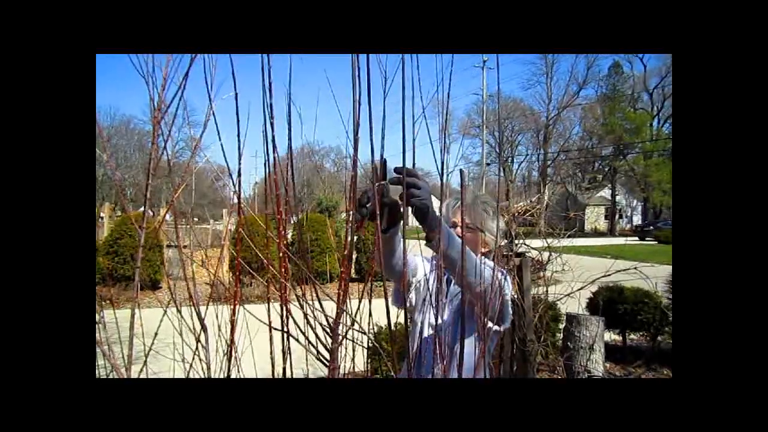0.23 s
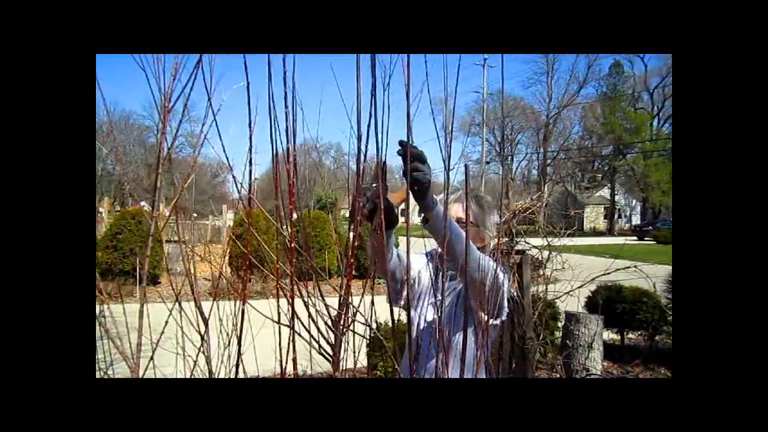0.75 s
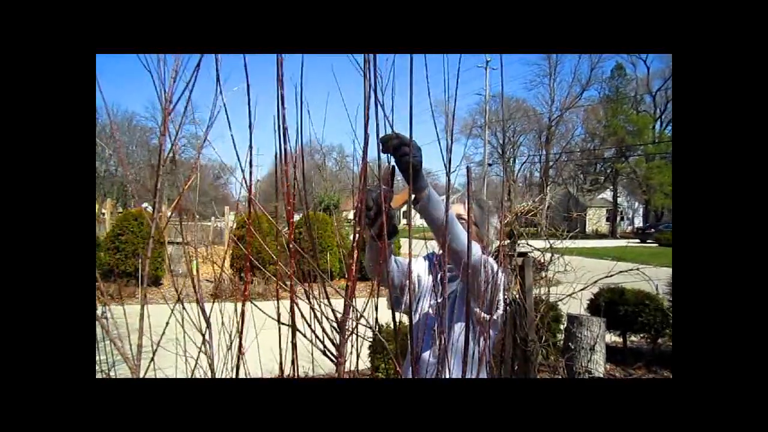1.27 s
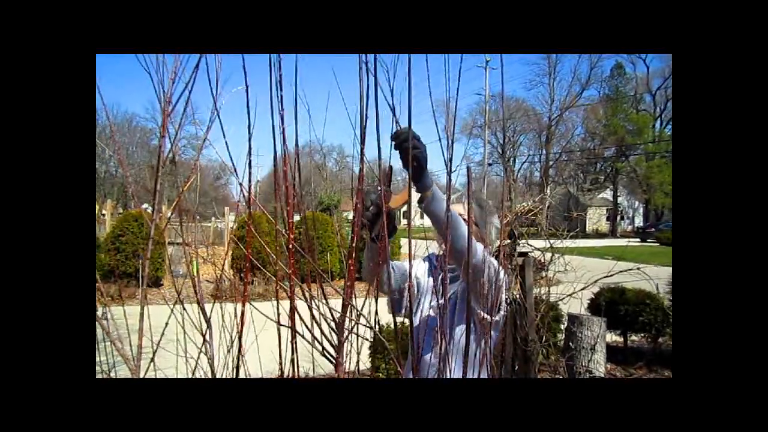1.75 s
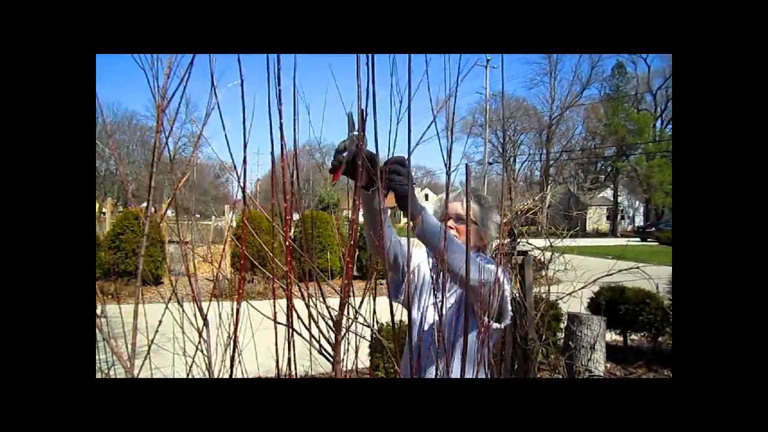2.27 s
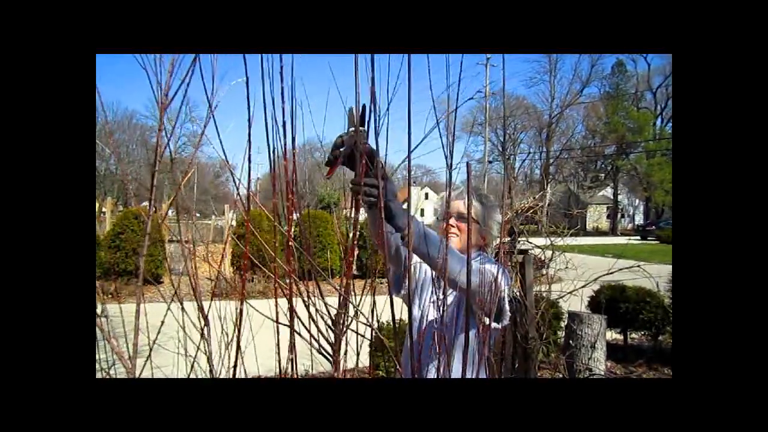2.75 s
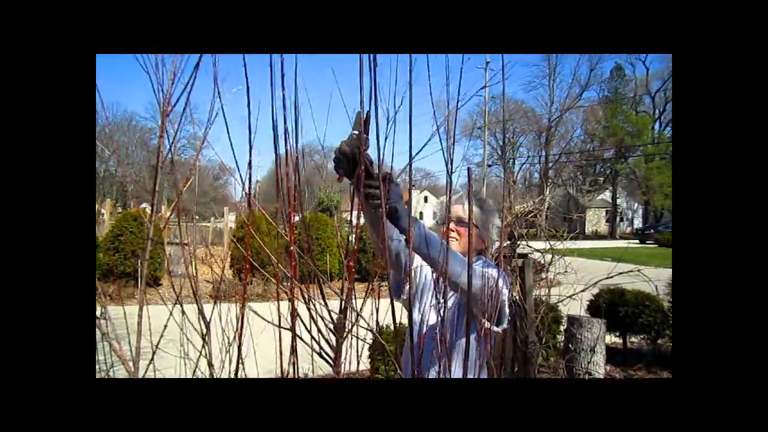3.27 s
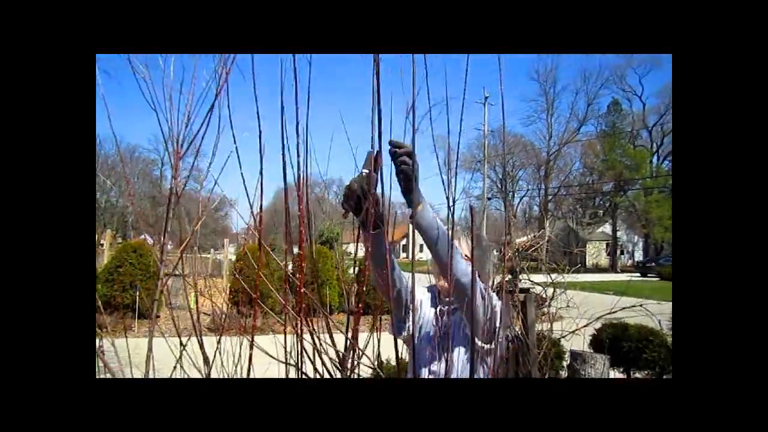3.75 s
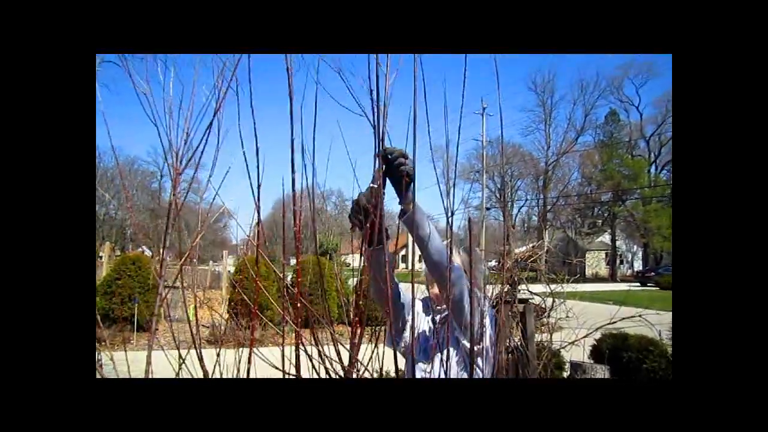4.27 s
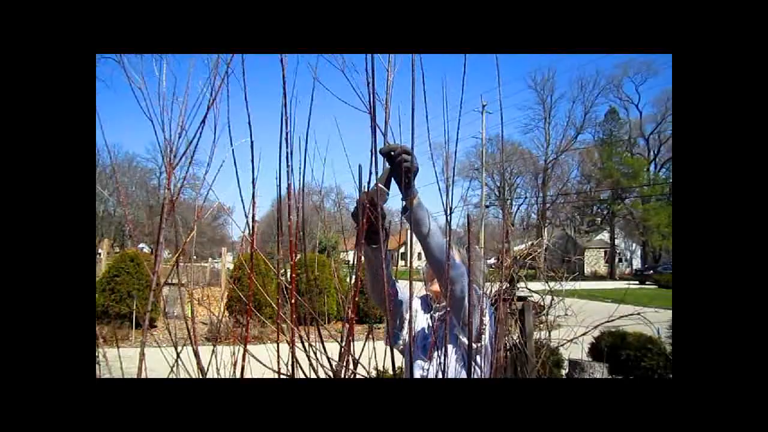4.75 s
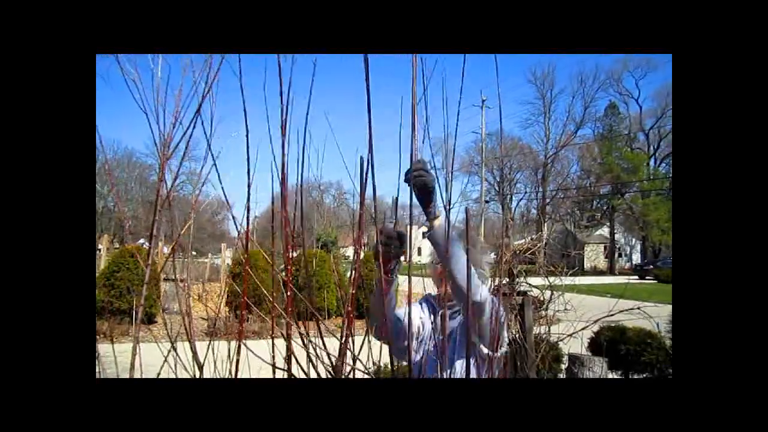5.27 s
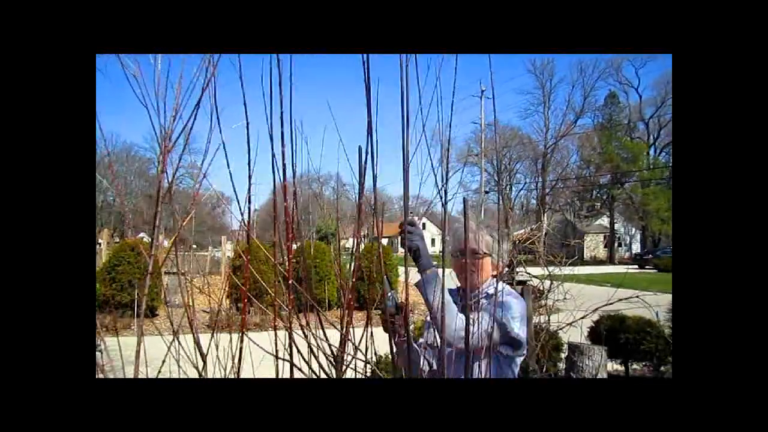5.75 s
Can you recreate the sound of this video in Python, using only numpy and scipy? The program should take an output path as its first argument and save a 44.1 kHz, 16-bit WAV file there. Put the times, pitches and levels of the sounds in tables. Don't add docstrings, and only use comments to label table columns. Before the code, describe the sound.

Hand pruners snip woody stems with sharp, dry clacks in irregular bursts, over wind puffs, faint distant bird whistles and low traffic rumble.

```python
import sys
import numpy as np
from scipy import signal
from scipy.fft import rfft, irfft
from scipy.io import wavfile
from scipy.ndimage import uniform_filter1d

SR = 44100
rng = np.random.default_rng(int(sys.argv[2]) if len(sys.argv) > 2 else 0)


def magnitude_from_level(level_db):
    exponent = np.asarray(level_db, float) / 20
    return 10 ** exponent


def unload_audio(sound):
    columns = np.transpose(np.atleast_2d(sound))
    steps = np.round(np.clip(columns, -1, 1) * 32767)
    wavfile.write(sys.argv[1], SR, steps.astype(np.int16))


N = 265482


def rms_one(x):
    return x / np.sqrt(np.mean(x ** 2) + 1e-20)


def peak_one(x):
    return x / np.max(np.abs(x))


def in_time(rows):
    s, *columns = np.transpose(rows)
    return [np.interp(np.arange(N) / SR, s, column) for column in columns]


def coloured(points, size):
    hz = np.maximum(np.fft.rfftfreq(size, 1 / SR), 1)
    point_hz, point_db = np.transpose(points)
    db = np.interp(np.log(hz), np.log(point_hz), point_db, left=-90, right=-90)
    return rms_one(irfft(rfft(rng.standard_normal(size)) * magnitude_from_level(db), size))


def drift(per_s):
    r = np.exp(-80 * np.pi * per_s / SR)
    slow = signal.lfilter([1], [1, -2 * r, r * r], rng.standard_normal(N // 40 + 2002))
    slow = rms_one(slow[2000:])
    return np.interp(np.arange(N) / 40, np.arange(len(slow)), slow)


def swell(s, rise_s, fall_s):
    t = np.arange(N) / SR - s
    return np.exp(-np.abs(t) / np.where(t < 0, rise_s, fall_s))


def ring(push, hz, t60):
    r = magnitude_from_level(-60 / (t60 * SR))
    w = 2 * np.pi * hz / SR
    return signal.lfilter([0, np.sin(w)], [1, -2 * r * np.cos(w), r * r], push)


def struck(modes, push, spread_db):
    pitch_spread = .03
    total = 0
    for k, (hz, db, t60) in enumerate(modes):
        strength = magnitude_from_level(db + spread_db * rng.normal())
        pitch = hz * (1 + pitch_spread * rng.normal())
        total = total + (-1) ** k * strength * ring(push, pitch, t60)
    return peak_one(total)


def thin(x, hz):
    return signal.sosfilt(signal.butter(2, hz, "high", fs=SR, output="sos"), x)


def add(out, s, sound):
    i = max(round(s * SR), 0)
    out[i:i + len(sound)] += sound[:N - i]


# (time [s], level [dB])
BREEZE = [(0, -37.5), (.2, -48), (.9, -45), (1.7, -45), (2.0, -53), (2.44, -56), (2.52, -43), (2.8, -45),
          (3.3, -43), (3.9, -43.5), (4.1, -47.5), (4.39, -67), (4.55, -47.5), (4.95, -37.5), (5.12, -52.5),
          (5.3, -43.5), (5.7, -52.5), (6.02, -45)]
# (time [s], peak level [dB], swing rate [Hz])
EDDIES = [(.02, -29, 50.4), (0.108, -28, 60), (0.234, -40, 92.7), (0.373, -35, 40.4), (0.653, -33.5, 69),
          (0.849, -33.5, 45.5), (1.412, -43, 40.4), (1.68, -42, 90), (2.489, -26, 59), (2.6, -31, 66.6),
          (2.643, -30, 114), (2.681, -31.5, 80.5), (2.885, -38.5, 99), (2.921, -38.5, 83), (3.242, -26, 79),
          (3.333, -30.5, 75), (3.597, -44, 95), (3.706, -40, 62.6), (3.817, -38, 45.8), (4.545, -43.5, 60),
          (4.634, -38.5, 88), (4.701, -34, 70), (4.794, -31.5, 61.4), (4.858, -44, 87), (5.17, -29.5, 51.5),
          (5.256, -35, 83), (5.29, -30, 70.5), (5.4, -28, 84.5), (5.572, -40, 59.6), (5.925, -29, 101)]
# (frequency [Hz], level [dB per Hz])
BREEZE_COLOUR = [(12, -30), (20, 6), (43, -1), (85, -2.5), (320, -40), (420, -84), (700, -120)]


def wind():
    noise = coloured(BREEZE_COLOUR, N)
    noise = noise / np.sqrt(uniform_filter1d(noise ** 2, size=3500) + .1)
    stir = sum(magnitude_from_level(db - 4.5) * swell(s + 0.56 / hz, rise_s=0.011, fall_s=0.016) for s, db, hz in EDDIES)
    out = (magnitude_from_level(in_time(BREEZE)[0] - 4.0 + 1.9 * drift(11.0)) + stir) * noise
    t = np.arange(SR // 6) / SR
    for s, db, hz in EDDIES:
        push = np.diff(np.exp(-((t - 0.29 / hz) * hz / 0.11) ** 2), prepend=0)
        direction = rng.choice([-1, 1])
        add(out, s, direction * magnitude_from_level(db - 7.0) * peak_one(ring(push, hz, 0.87 / hz)))
    return out


# (frequency [Hz], level [dB per Hz])
TRAFFIC_COLOUR = [(35, -1.5), (60, -7.5), (113, -3), (173, -10.5), (283, -14), (659, -17.5), (796, -17),
                  (1650, -25.5), (4530, -31.5), (7960, -36), (13700, -44.5), (15400, -51), (16500, -85)]
# (time [s], pitch [Hz], level [dB])
MOTOR = [
    (0, 121.6, -67),
    (1.2, 121.5, -60),
    (2.2, 121.3, -63),
    (2.6, 110.6, -78),
    (6.02, 125.5, -105),
]


def distance():
    hz, db = in_time(MOTOR)
    phase = 2 * np.pi * np.cumsum(hz + 3.2 * drift(3.4)) / SR
    hum = np.sqrt(2) * magnitude_from_level(db + 0.87 * drift(4.4)) * np.sin(phase)
    air = coloured(TRAFFIC_COLOUR, N)
    upper = signal.sosfilt(signal.butter(4, 250, "high", fs=SR, output="sos"), air)
    return magnitude_from_level(-62.5 + 1.0 + 0.51 * drift(0.73)) * air / np.std(upper) + hum


NOTE_FADE_DB = -15.5


def arch(top_s, rise_s, foot_hz, top_hz, db):
    glide_share, hump_width, fall_share, dip_db_per_khz = .45, .4, .66, -3.5
    u = np.linspace(-1, 1, 31)
    shape = glide_share * (1 - np.abs(u)) + (1 - glide_share) * np.exp(-(u / hump_width) ** 2)
    climb_hz = (top_hz - foot_hz) * shape
    level_db = db + dip_db_per_khz * climb_hz / 1000 + NOTE_FADE_DB * u ** 6
    s = top_s + rise_s * u * np.where(u < 0, 1, fall_share)
    return np.transpose([s, foot_hz + climb_hz, level_db])


def slide(start, length, from_hz, to_hz, db):
    u = np.linspace(0, 1, 9)
    level_db = db + NOTE_FADE_DB * (2 * u - 1) ** 4
    return np.transpose([start + length * u, from_hz + (to_hz - from_hz) * u, level_db])


def whistle(rows, per_s=0, depth=0):
    trill_top_s = 1.678
    s, hz, db = np.transpose(rows)
    t = np.arange(s[0], s[-1], 1 / SR)
    pitch = np.interp(t, s, hz) * (1 + depth * np.cos(2 * np.pi * per_s * (t - trill_top_s)))
    pitch = uniform_filter1d(pitch * (1 + 0.22 * rng.standard_normal(len(t))), size=300)
    ends = np.clip(np.minimum(t - s[0], s[-1] - t) / 0.0021, 0, 1)
    flutter = magnitude_from_level(2.36 * rms_one(uniform_filter1d(rng.standard_normal(len(t)), size=150)))
    level = np.sqrt(2) * magnitude_from_level(np.interp(t, s, db)) * ends * flutter
    return s[0], level * np.sin(2 * np.pi * np.cumsum(pitch) / SR)


# (frequency [Hz], level [dB per Hz])
OLD_NOTE_COLOUR = [(2700, -32), (2950, 1), (3400, 1), (3800, -7), (4200, -1), (4500, -33)]
# (start [s], length [s], from [Hz], to [Hz], level [dB])
RISING_NOTES = [(0.302, 0.053, 3666, 4720, -64.5), (0.308, 0.051, 4450, 4970, -67.5),
                (1.86, 0.027, 3600, 4270, -67), (1.864, 0.038, 1910, 2150, -70),
                (1.98, 0.047, 2220, 2710, -71), (3.189, .04, 3680, 4490, -67),
                (3.186, 0.042, 4350, 4730, -67), (5.873, 0.065, 2400, 2460, -71)]
# (top time [s], rise [s], foot [Hz], top [Hz], level [dB])
ARCHED_NOTES = [(.392, 0.03, 2620, 3030, -57.5), (1.937, 0.03, 2400, 2960, -61.5),
                (2.126, .088, 2930, 4200, -56.5), (3.273, 0.06, 2550, 3146, -62),
                (5.254, 0.11, 2820, 4080, -59)]
# (time [s], pitch [Hz], level [dB])
LOW_TRILL = [(1.625, 1150, -75), (1.655, 1405, -69), (1.68, 1650, -63.5), (1.72, 1650, -67),
             (1.76, 1600, -61.5), (1.8, 1513, -66.5), (1.83, 1700, -70)]


def birds():
    out = np.zeros(N)
    for rows in [arch(*row) for row in ARCHED_NOTES] + [slide(*row) for row in RISING_NOTES]:
        add(out, *whistle(rows))
    start, trill = whistle(LOW_TRILL, per_s=24.5, depth=.17)
    for late, db in [(0, -1), (.009, -8), (.023, -11)]:
        add(out, start + late, magnitude_from_level(db) * trill)
    t = np.arange(SR // 2) / SR
    add(out, 0, magnitude_from_level(-58 - 60 * t / 0.27) * coloured(OLD_NOTE_COLOUR, len(t)))
    add(out, .045, magnitude_from_level(-18) * out.copy())
    return out


# (time [s], level [dB])
IDLE_RUSTLE = [(0, -77), (.6, -73), (1.7, -93), (2.1, -69.5), (3.0, -77), (4.0, -70.5), (4.5, -80),
               (4.8, -74.5), (6.02, -68)]
# (time [s], level [dB], length [s])
BRUSHES = [(0.46, -68, 0.013), (1.84, -62.5, 0.041), (2.6, -70, 0.058), (3.89, -82.5, .1),
           (4.64, -67.5, 0.077), (5.093, -64, 0.031), (5.633, -66, 0.051), (5.832, -61.5, 0.015),
           (5.977, -60.5, 0.055)]
# (frequency [Hz], level [dB per Hz])
BRUSH_COLOUR = [(470, -22), (800, -7), (1900, -3), (2630, -5), (4340, -3.5), (13400, -22), (16000, -21)]


def rustle():
    sizes = magnitude_from_level(0.71 * np.minimum(rng.exponential(1, N), 4))
    grains = (rng.random(N) < 1500 / SR) * sizes
    gate = signal.lfilter([1], [1, -.97], grains)
    level = magnitude_from_level(in_time(IDLE_RUSTLE)[0])
    level = level + sum(magnitude_from_level(db) * swell(s, 0.37 * length, length) for s, db, length in BRUSHES)
    return level * rms_one(coloured(BRUSH_COLOUR, N) * gate)


# (time [s], peak level [dB], ring
# [Hz])
LIGHT_TICKS = [(0.474, -51.5, 2320), (0.5706, -54, 4700), (0.7993, -53.5, 2680), (0.9014, -51.5, 2290),
               (1.3924, -38, 4200), (1.4676, -42, 3000), (1.4844, -48, 4370), (1.4904, -46, 1910),
               (1.8394, -58, 4000), (2.6094, -62, 2130), (2.7786, -51.5, 2490), (3.2375, -52, 2720),
               (3.2824, -46, 2750), (3.4905, -50, 2430), (4.3175, -46, 2370), (3.539, -45.5, 2400),
               (4.4283, -48.5, 3250), (4.9329, -47, 4100), (5.0873, -54, 3200), (5.0965, -45.5, 4300),
               (5.1194, -54, 2870), (5.3644, -51, 1920), (5.5413, -52, 2850), (5.605, -55, 2260),
               (5.6311, -50, 4140), (5.6605, -50, 4300), (5.7099, -49.5, 4140), (5.8336, -51, 2500),
               (5.9479, -58, 1900), (5.9744, -52, 1870)]
# (delay after snip [s], level under the
# snip [dB], ring [Hz])
REBOUNDS_AND_ECHOES = [(.0083, -23, 1400), (.013, -25, 2320), (0.024, -38, 2330), (.078, -40, 2500),
                       (0.0998, -46, 2770)]
# (frequency [Hz], level [dB], t60 [s])
BLADE_MODES = [(2400, -14, 0.022), (2950, 3.5, 0.0049), (3500, 0.5, 0.0084), (4200, 9.5, 0.0042),
               (5400, 11.5, 0.0026), (6450, 5, 0.0047), (7320, -3, .003)]
# (frequency [Hz], level [dB], t60 [s])
EDGE_MODES = [(8080, -0.5, 0.0033), (10100, -1, 0.0028), (10700, -3, .0025), (12150, 3, 0.0019),
              (14400, -11, .002)]


def ticks():
    out, t = np.zeros(N), np.arange(SR // 25) / SR
    hard = [(s, db) for s, db, *_ in SNIP_BLOWS if db > -18]
    rebounds = [(s + late, db + under_db, hz) for s, db in hard for late, under_db, hz in REBOUNDS_AND_ECHOES]
    for s, db, hz in rebounds + LIGHT_TICKS:
        push = rng.standard_normal(len(t)) * np.exp(-t / 0.0015)
        touch = 0.88 * struck(BLADE_MODES, push, spread_db=-0.5)
        touch = touch + 0.053 * struck(EDGE_MODES, push, spread_db=-2.0)
        touch = touch + 1.3 * peak_one(ring(push, hz, 0.0076))
        add(out, s, magnitude_from_level(db) * peak_one(thin(touch, hz=1090)))
    return out


# (end time [s], length [s],
# start level [dB], end level [dB])
CRUSHES_AND_LEAD_INS = [(1.399, 0.015, -62, -42), (1.427, 0.015, -32.5, -53), (1.439, 0.018, -47, -55),
                        (1.46, 0.022, -60, -55), (1.508, 0.05, -63, -62), (1.57, 0.0064, -61, -58),
                        (3.439, 0.0027, -80, -56), (4.3254, 0.00208, -56, -56), (4.682, 0.006, -52, -39.5),
                        (4.8567, 0.014, -76, -48)]
# (frequency [Hz], level [dB per Hz])
SHAKE_COLOUR = [(400, -22), (700, -10), (1300, 7.5), (2300, 8.5), (3500, 6.5), (6000, 3.5), (7500, -2),
                (10500, -6.5), (16000, -15)]


def crushes():
    out = np.zeros(N)
    for end, length, start_db, end_db in CRUSHES_AND_LEAD_INS:
        size = round(length * SR)
        grains = magnitude_from_level(3 * np.repeat(rng.standard_normal(100), 30)[:size])
        noise = rms_one(grains * coloured(SHAKE_COLOUR, 3000)[:size])
        add(out, end - length, magnitude_from_level(np.linspace(start_db, end_db, size)) * noise)
    return out


# (time [s], peak level [dB], blade ring [Hz], wood share [dB], edge share [dB])
SNIP_BLOWS = [
    (1.4023, -20, 4100, -5, -6),
    (1.4087, -28.5, 4650, 10, 16),
    (1.445, -34, 4630, -5, -9),
    (1.5726, -12, 5400, -11.5, -6),
    (3.4391, -12.5, 5930, -19, -9),
    (4.3289, -9.5, 3500, -22, -5.5),
    (4.6841, -12, 4400, -1.5, -12),
    (4.8564, -14.5, 5200, -9.5, -1),
]
# (frequency [Hz], level [dB], t60 [s])
WOOD_MODES = [(390, 2.5, 0.012), (680, -16, 0.0026), (1040, -14, 0.0085), (1256, 16.5, 0.024),
              (1700, 6.5, 0.023), (2205, 24.5, 0.0045)]
# (frequency [Hz], level [dB per Hz])
STEM_COLOUR = [(2000, -12), (3500, -4), (5000, -4), (7000, 0), (8500, -16), (14000, -14)]


def snips():
    out, t = np.zeros(N), np.arange(SR // 5) / SR
    for s, db, hz, wood_db, edge_db in SNIP_BLOWS:
        push = .15 * rng.standard_normal(len(t)) * np.exp(-t / .0007)
        push[round(.0005 * SR)] += 1
        blade_ring = peak_one(ring(ring(push, hz, .002), hz, .002))
        crack = struck(BLADE_MODES, push, spread_db=1.5) + .35 * blade_ring
        crack = peak_one(thin(crack, hz=1910))
        pop = peak_one(ring(push, 1050, .003))
        wood = peak_one(1.5 * struck(WOOD_MODES, push, spread_db=3.0) - 1.3 * pop)
        wood = thin(wood, hz=450 * magnitude_from_level(-wood_db / 2))
        edges = thin(struck(EDGE_MODES, push, spread_db=2.0), hz=5000)
        cut = peak_one(crack + magnitude_from_level(wood_db) * wood + magnitude_from_level(edge_db) * edges)

        steps = np.repeat(rng.standard_normal(len(t) // 63), 63)
        lumps = magnitude_from_level(3 * uniform_filter1d(steps, size=30))
        shake = coloured(SHAKE_COLOUR, len(t)) * lumps * magnitude_from_level(-60 * t / 0.054)
        late = coloured(STEM_COLOUR, len(t)) * magnitude_from_level(-28 - 0.48 * wood_db - 60 * t / 0.24)
        onset = np.clip(t / .003 - .3, 0, 1)
        shake_level = magnitude_from_level(-28 - 0.47 * db)
        add(out, s, magnitude_from_level(db) * (cut + shake_level * (shake + late) * onset))
    return out


# (time [s], level [dB], pitch [Hz], t60 [s])
THICK_STEM_HUM = (4.69, -57.5, 1722, 0.5)


def stem_hum():
    s, db, hz, t60 = THICK_STEM_HUM
    out, t = np.zeros(N), np.arange(SR // 4) / SR
    hum = rms_one(ring(ring(rng.standard_normal(len(t)), hz, .012), hz, .012))
    add(out, s, magnitude_from_level(db - 60 * t / t60) * hum)
    return out


# (delay [s], level [dB])
GARDEN_ECHOES = [
    (.0031, -10),
    (.0085, -21),
    (.050, -39),
    (.0995, -33),
]


def garden(x):
    out = x.copy()
    for late, db in GARDEN_ECHOES:
        band_hz = [2200, 9000 if late < .02 else 7000]
        dull = signal.sosfilt(signal.butter(2, band_hz, "band", fs=SR, output="sos"), x)
        add(out, late, magnitude_from_level(db) * dull)
    return out


def scattered(x, t60, wet_db):
    t = np.arange(SR // 2) / SR
    blur = rng.standard_normal(len(t)) * magnitude_from_level(-60 * t / t60) * (t > .012)
    blur = blur / np.sqrt(np.sum(blur ** 2))
    return x + magnitude_from_level(wet_db) * signal.fftconvolve(x, blur)[:N]


def scene():
    tool = scattered(garden(snips()) + crushes() + ticks() + stem_hum(), t60=0.33, wet_db=-39)
    far_birds = scattered(birds(), t60=0.59, wet_db=-7.5)
    return (tool + rustle() + far_birds + wind() + distance())[None]


def top_cut(x):
    return signal.sosfilt(signal.butter(12, 17030, fs=SR, output="sos"), x)


def record(dry):
    x = signal.sosfilt(signal.butter(2, 22, "high", fs=SR, output="sos"), dry)
    x = signal.sosfilt(signal.cheby2(10, 50, 17200, fs=SR, output="sos"), x)
    return top_cut(x)


dry = scene()
out = record(dry)
unload_audio(out)
```